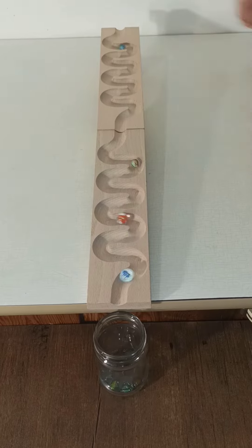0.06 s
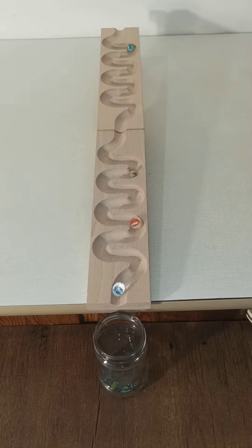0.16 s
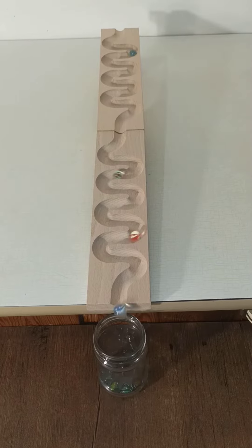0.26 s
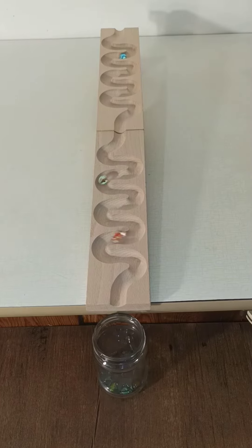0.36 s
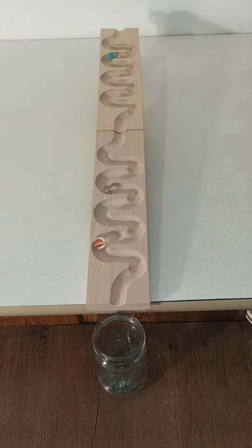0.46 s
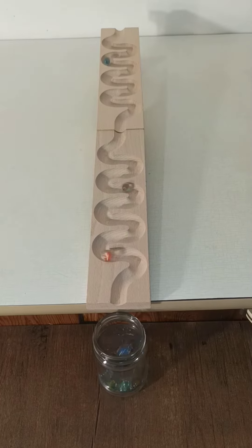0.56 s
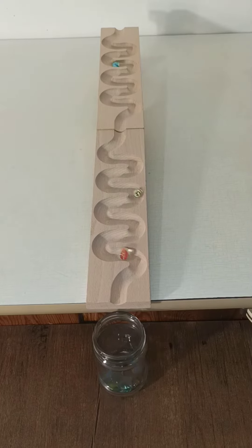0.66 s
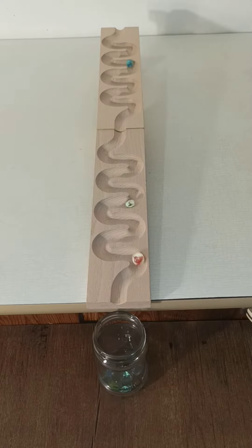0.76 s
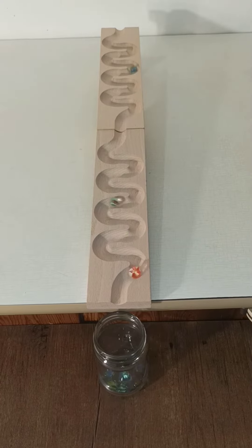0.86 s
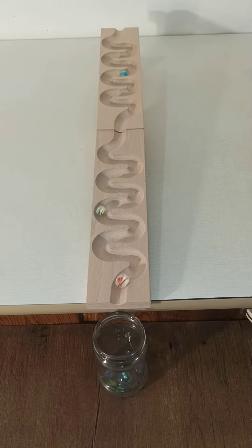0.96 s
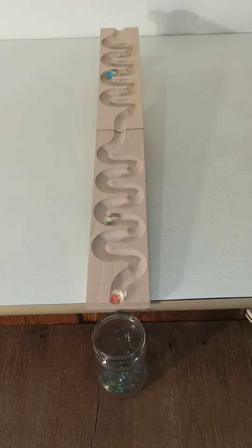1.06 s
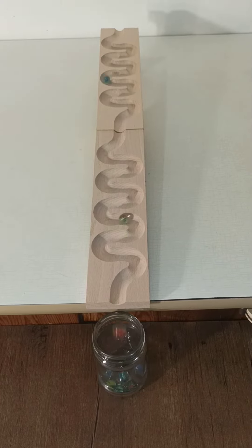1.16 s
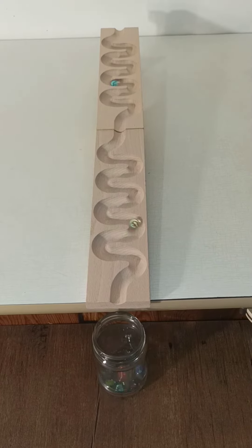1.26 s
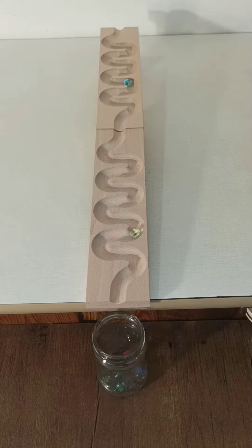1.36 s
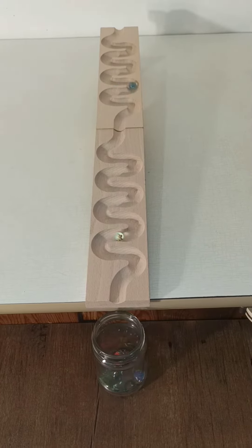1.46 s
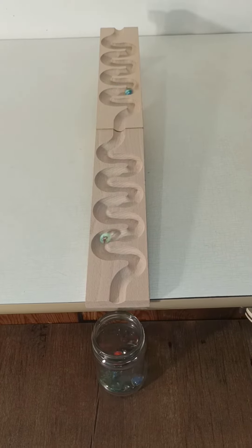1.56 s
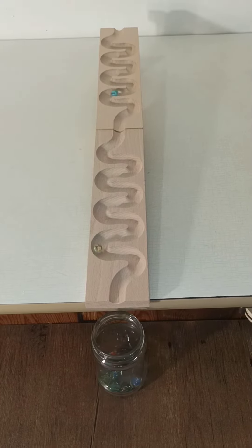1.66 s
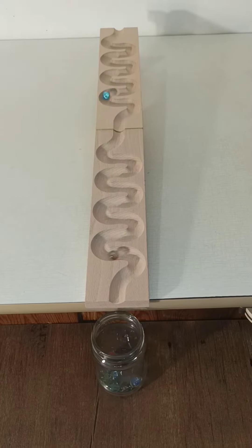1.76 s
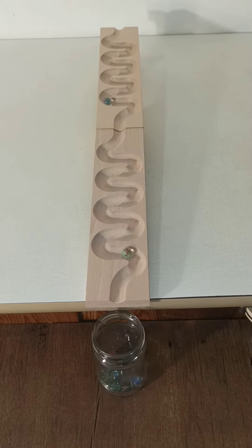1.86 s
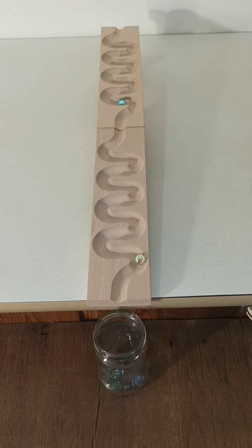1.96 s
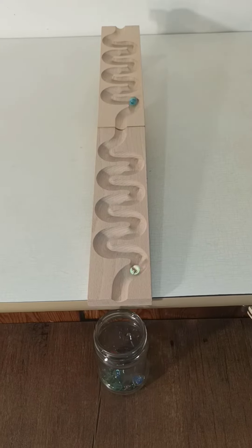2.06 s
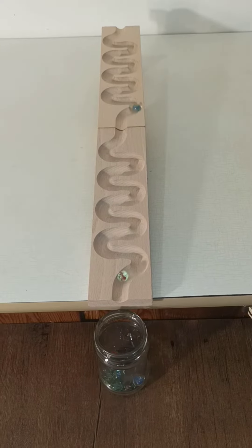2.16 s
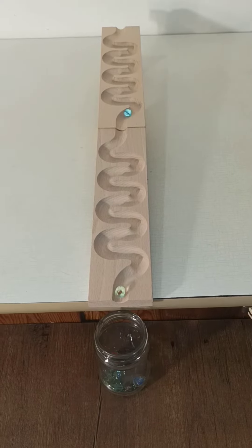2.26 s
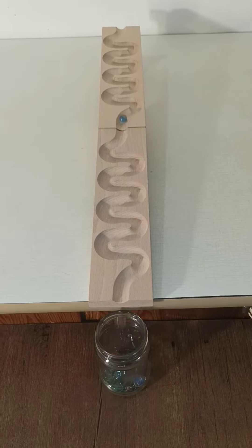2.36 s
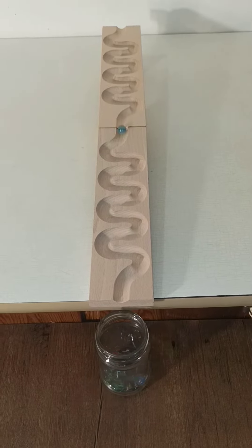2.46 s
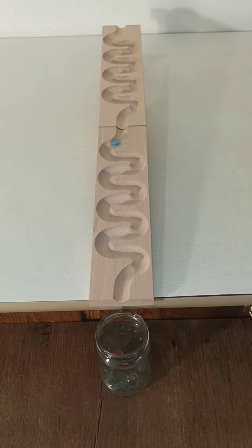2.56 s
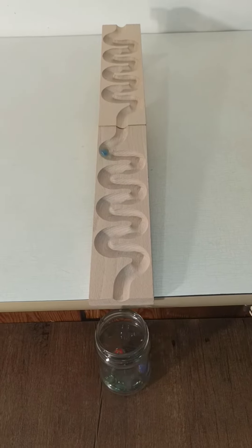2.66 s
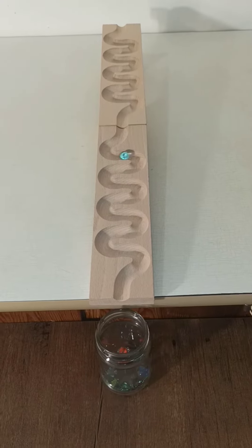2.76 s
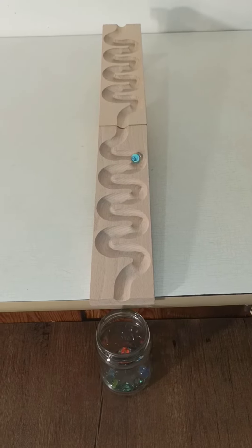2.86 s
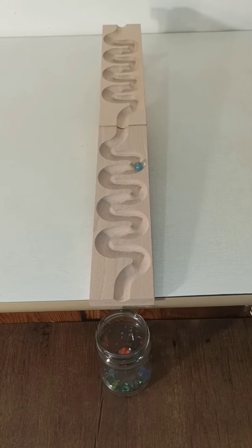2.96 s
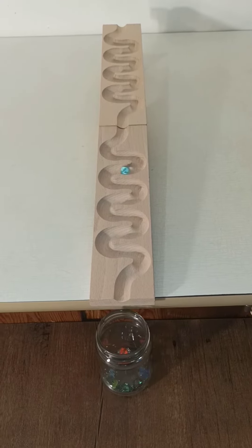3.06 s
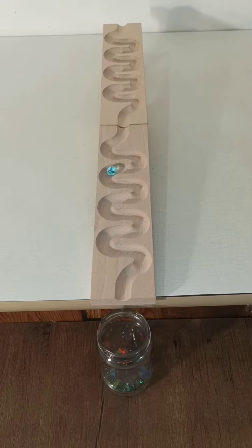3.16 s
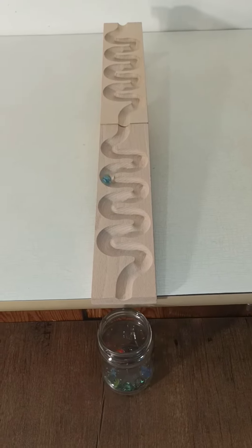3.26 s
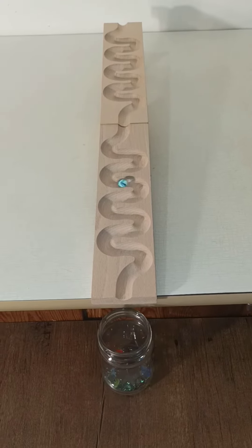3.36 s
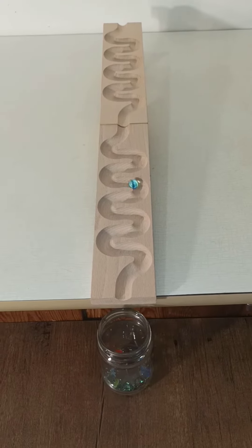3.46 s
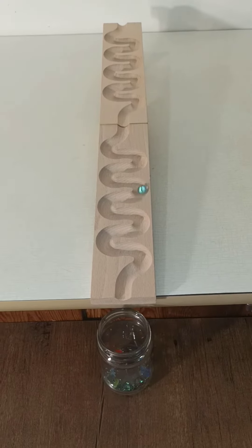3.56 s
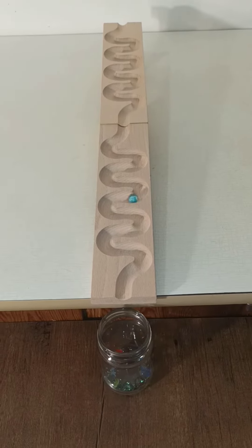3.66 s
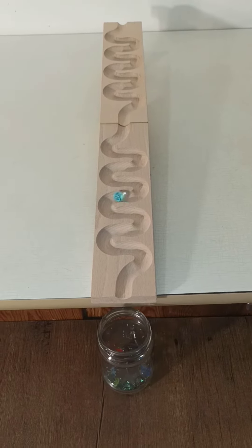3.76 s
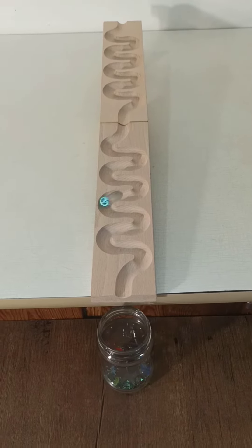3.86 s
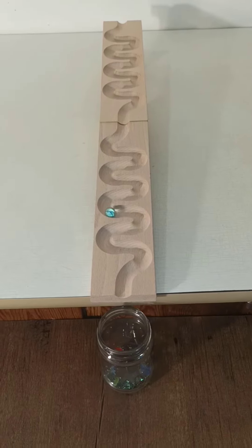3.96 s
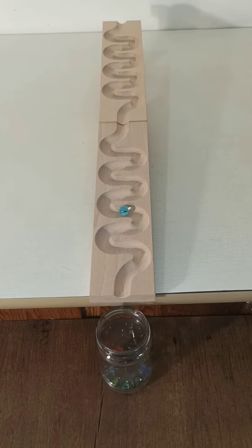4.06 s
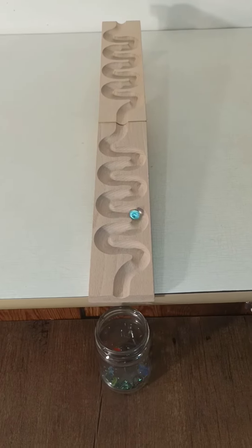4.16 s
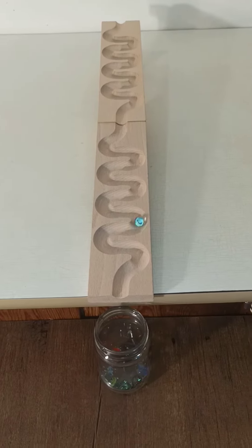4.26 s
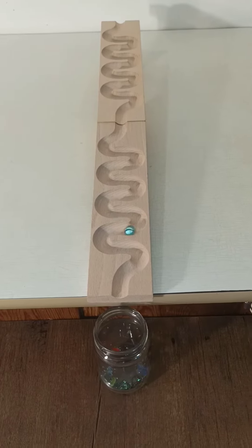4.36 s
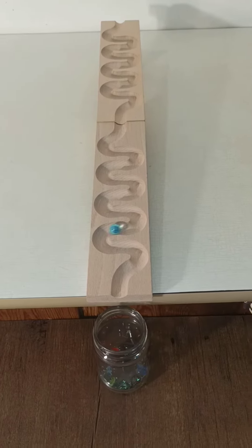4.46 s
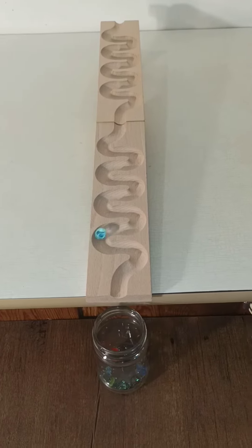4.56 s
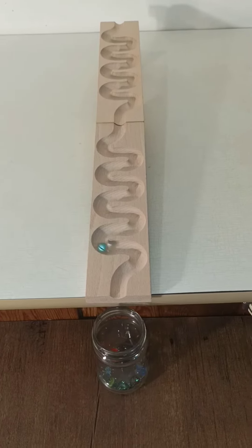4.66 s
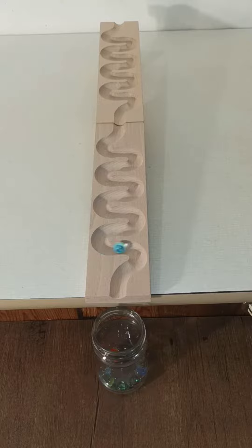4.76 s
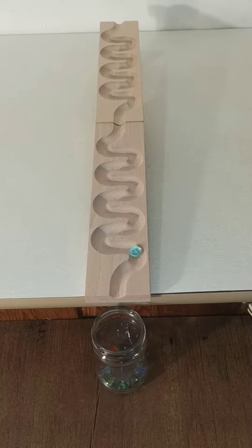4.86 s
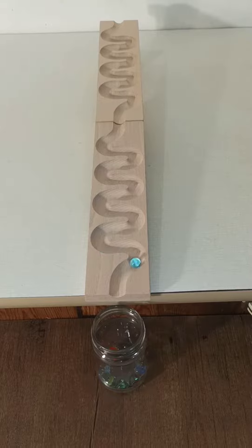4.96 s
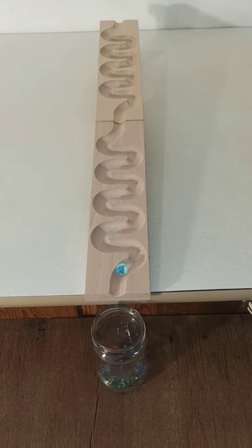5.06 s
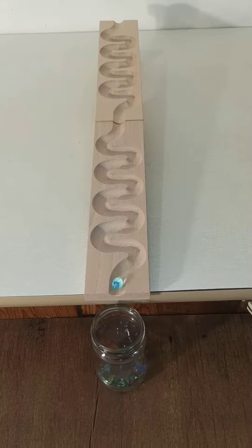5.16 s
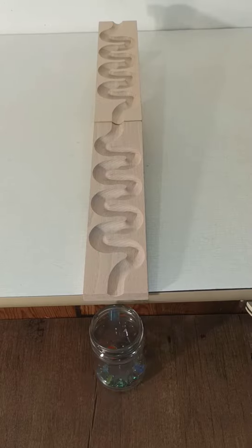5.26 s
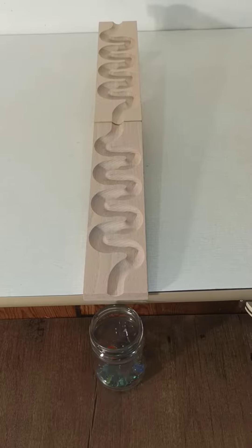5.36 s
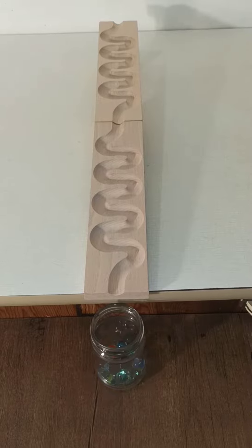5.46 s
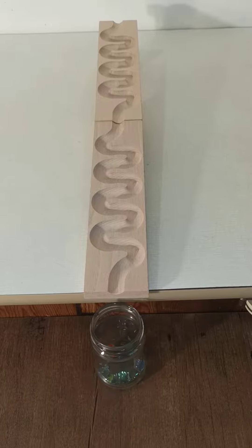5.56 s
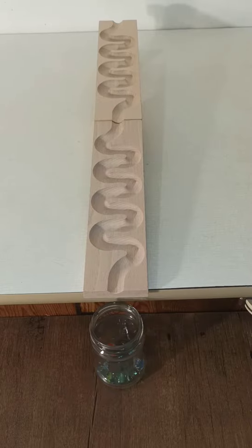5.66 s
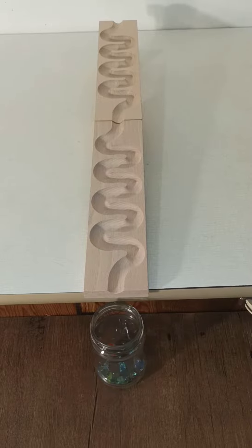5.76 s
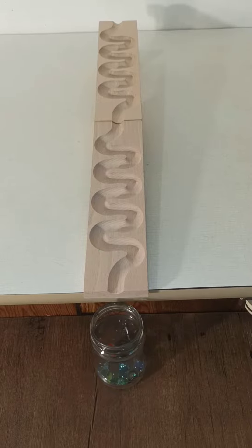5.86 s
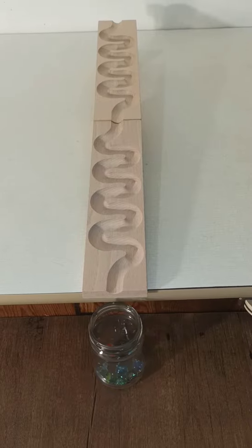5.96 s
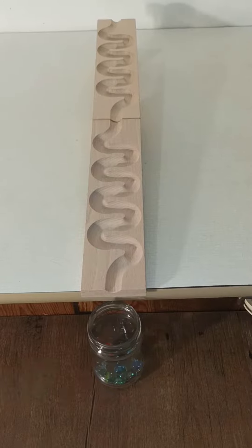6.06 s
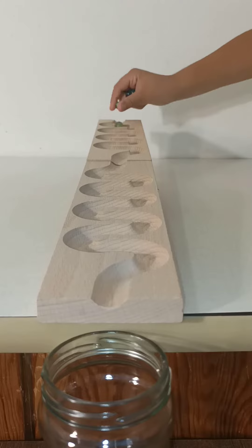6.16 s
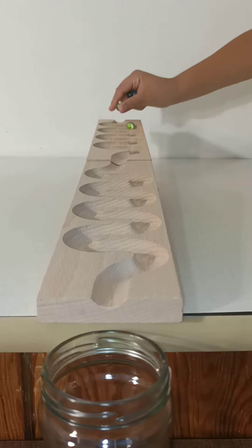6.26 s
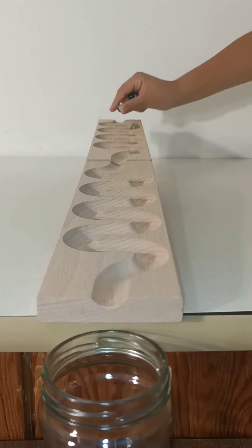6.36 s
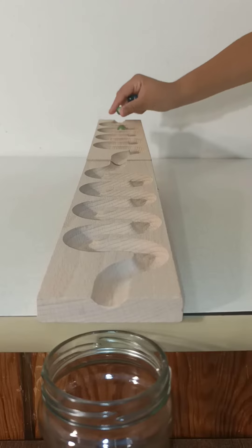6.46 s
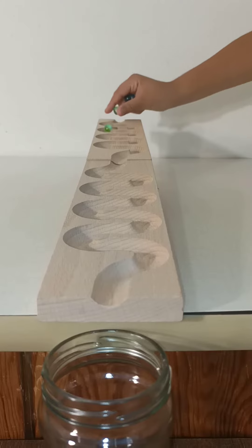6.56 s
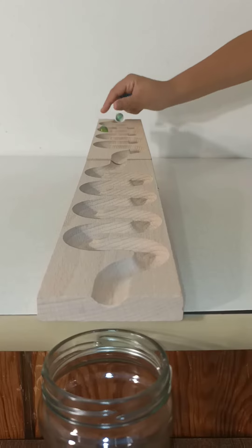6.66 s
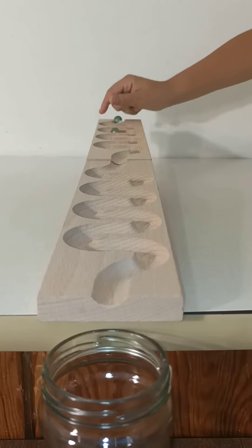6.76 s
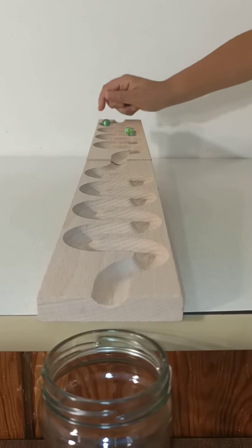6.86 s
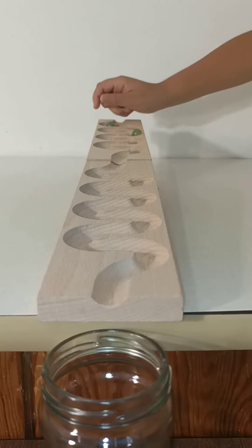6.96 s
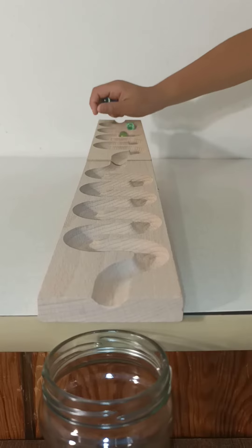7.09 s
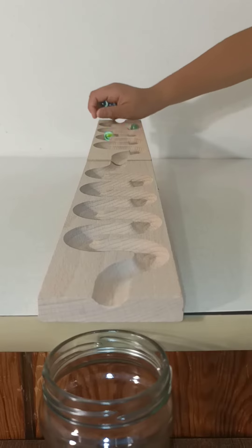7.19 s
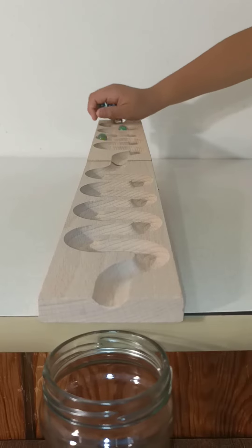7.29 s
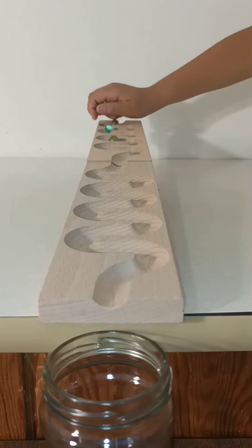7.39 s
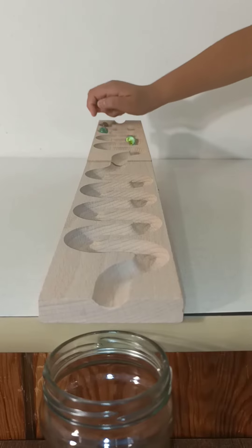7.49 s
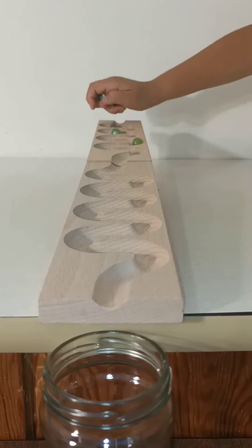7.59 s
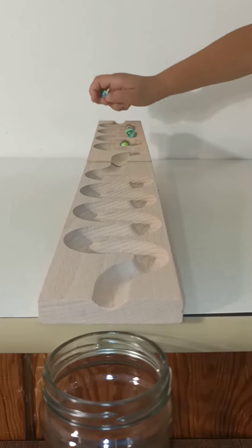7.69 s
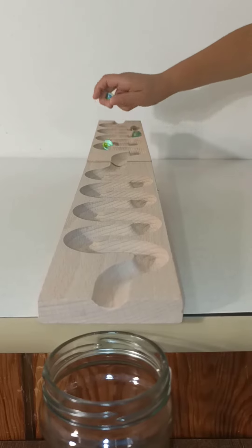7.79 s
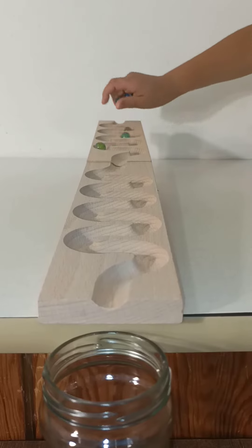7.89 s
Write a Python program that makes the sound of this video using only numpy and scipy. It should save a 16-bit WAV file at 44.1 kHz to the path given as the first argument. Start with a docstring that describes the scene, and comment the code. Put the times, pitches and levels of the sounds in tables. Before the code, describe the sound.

In a small bare room, glass marbles roll down a grooved wooden board with a low grainy rumble and soft knocks at the bends. Four drop into a glass jar, each with a hard crack, quick bounces and a bright ringing rattle that settles. After the last one the sound cuts to a more distant, echoing view, where marbles are dropped on the wood with clicks and roll off. Close stereo microphone, faint hiss.

```python
"""In a bare small room, glass marbles roll down a winding wooden groove, knock at its bends and drop one by
one into a glass jar, where they clink and rattle until they settle. Then a cut to a place farther away: a
hand drops marbles on the top of the board. Noise bursts and small random contacts drive the modes of glass
and wood; coloured noise fills in between the modes. Sparse taps make the room, soft noise its air and hiss.
A pair of close microphone ports with a limiter picks it up."""
import sys
import numpy as np
from scipy import signal
from scipy.fft import rfft, irfft, next_fast_len
from scipy.io import wavfile
from scipy.ndimage import uniform_filter1d, minimum_filter1d

SR = 44100
rng = np.random.default_rng(int(sys.argv[2]) if len(sys.argv) > 2 else 0)


def output_pcm(signal):
    """Save a mono or channel-first signal as 16-bit PCM at the path in sys.argv[1].

    Samples are clipped to [-1, 1] before scaling.
    """
    pcm = np.clip(np.atleast_2d(signal).T, -1, 1) * 32767
    wavfile.write(sys.argv[1], SR, np.round(pcm).astype(np.int16))


def gain_from_db(level_db):
    """Turn a decibel level (scalar or array-like) into a linear amplitude factor."""
    decades = np.asarray(level_db, float) / 20
    return 10 ** decades


N = 349713
TIME = np.arange(N) / SR
LIVELY_DB = -11  # jostle level below which the jar counts as settling

# Landings and bounces in the jar. Each row: time in seconds, crack level in dB, then the thud and the ring
# in dB added to the crack level.
CLINKS = [(0.358, -4, -17.5, 2.5), (0.372, -14, -1.5, -5), (0.382, -18, -21, -6), (0.398, -19, -12, -9.5),
          (0.415, -26.5, -17, 1.5), (0.457, -36.5, -16, 5), (0.5426, -14.5, -5.5, -8),
          (0.5576, -13.5, -20.5, -9), (0.613, -18, -15.5, 6.5), (0.645, -12, -9, 1),
          (0.666, -32, -15.5, -6), (0.692, -18.5, -27, -8.5), (0.7361, -37, -17.5, 4),
          (0.9162, -29.5, -21.5, 7.5), (1.2083, -9.5, -12.5, -5), (1.222, -3.5, -17, -6),
          (1.2449, -14, -26, -10), (1.283, -22.5, -16.5, -3.5), (1.3216, -21.5, -25, -1),
          (1.3441, -7, -7.5, 0.5), (1.4142, -7.5, -12, 2.5), (1.4725, -19, -13, -3.5),
          (1.515, -33.5, -13.5, 0), (1.5359, -30.5, -14.5, 5), (1.6562, -37, -10.5, 20.5),
          (2.4198, -27, -13.5, -0.5), (2.425, -9, -17, -4), (2.439, -17, -2.5, -8),
          (2.4928, -17.5, -15.5, -17), (2.5295, -10, -21, 5), (2.618, -27, -13, -2.5),
          (2.7005, -21, -5, -6), (2.811, -35.5, -12, 21.5), (3.2441, -37, -9, 4.5), (5.3254, -8, -18.5, 7),
          (5.337, -5.5, -7.5, -11.5), (5.348, -23, -13.5, -15), (5.3718, -26, -10.5, 9),
          (5.417, -10, -15, 9.5), (5.489, -21, -17.5, -16.5), (5.498, -20, -6.5, 4),
          (5.5067, -25, -12.5, 7), (5.553, -20, -23, -5.5), (5.6663, -50, -13.5, 18),
          (5.697, -38, -14.5, 10), (5.7457, -35, -39, 10), (5.769, -34.5, -12.5, 1),
          (5.7866, -39, -6.5, 23), (5.9012, -43, -3.5, 13)]
# Blows that leave the glass singing, each in place of the one before. Each row: time in seconds, wall level
# in dB, shoulder level in dB.
STRIKES = [(.358, -35, -35), (.395, -28, -26.5), (.5426, -25.5, -30.5), (.68, -34.5, -34),
           (.87, -37, -30.5), (1.207, -27, -28.5), (1.27, -23.5, -26), (1.37, -22, -33.5),
           (1.43, -35, -31.5), (1.6544, -38, -31), (2.445, -25.5, -34.5), (2.5275, -30.5, -28.5),
           (2.575, -35, -32.5), (2.6985, -34.5, -40.5), (2.81, -39, -38), (3.2455, -42, -39.5),
           (5.3259, -30.5, -29.5)]
# A marble knocks on a bend or is dropped on the wood. Each row: time in seconds, level in dB, then the low
# knock and the hard knock in dB added to that level.
KNOCKS = [(0.0505, -33.5, 14, -10), (0.148, -25, 2, -20), (.2904, -38, -13, -28.5), (1.114, -48, 5.5, 2.5),
          (1.162, -34, -12.5, -7.5), (1.8718, -30.5, 1, -25.5), (1.9736, -36, 10, -3.5),
          (1.99, -32.5, 11, -17.5), (2.0436, -38.5, -11.5, -24.5), (2.065, -44.5, -5, -28),
          (2.098, -40.5, 6, -15), (2.2166, -35, -1, -24.5), (2.231, -33.5, 9, -22.5),
          (2.296, -35, -7, -25.5), (2.383, -35.5, -5, -26), (2.317, -34.5, -31, -39),
          (2.347, -29.5, -18, -38), (3.117, -59, -7, -18), (3.1384, -57, -10, 6), (3.1655, -35, -5, -6.5),
          (3.259, -41.5, 19.5, -7), (3.3549, -38, 5, -8), (3.469, -35, -1, -11), (3.5376, -35.5, 5, -13.5),
          (3.5692, -35.5, 9, -8), (3.7636, -32, -15, -7), (3.800, -32.5, -9, -6.5), (3.858, -34, 7, -6.5),
          (3.894, -27, -2, -6), (4.0812, -53.5, -7, -14), (4.158, -39.5, 14, -16), (4.214, -34, -2, -16.5),
          (4.38, -34, -12, -17), (4.441, -48, -5, -14), (4.493, -40.5, -5, -13), (4.522, -43, -11, -8),
          (4.576, -31, -3, -4), (4.61, -43, 0.5, -14.5), (4.692, -48.5, 6, -19.5),
          (4.8826, -32.5, 10.5, -11), (4.925, -37, 11, -10.5), (5.0143, -33, 5, -18.5),
          (5.0883, -37.5, 7.5, -12.5), (5.1477, -29, -32, -16), (5.169, -44, 17.5, -10),
          (6.005, -31.5, -11, -7.5), (6.128, -35.5, 11, -24), (6.2481, -29.5, 4, -28),
          (6.2915, -31.5, 8, -17.5), (6.4505, -36, -6, -31), (6.521, -38, 8, -25), (6.551, -14, -32, -21.5),
          (6.6022, -18.5, 0.5, -15.5), (6.622, -22, -2, -9.5), (6.6666, -23.5, 1.5, -7),
          (6.9227, -32.5, 10.5, -25), (7.217, -17.5, -23, -15.5), (7.666, -33, 10, -26),
          (7.7507, -35, -14, -17)]


def evened(x):
    """Scales to rms 1."""
    return x / np.sqrt(np.mean(x ** 2) + 1e-20)


def read(points, hz):
    """Reads a table over frequency on a log-frequency axis."""
    f, value = np.transpose(points)
    return np.interp(np.log(hz + 1), np.log(f + 1), value)


def coloured(x, points, even=True):
    """Causal minimum-phase filter with the given spectrum and, if even, energy 1."""
    level_db = np.maximum(read(points, abs(np.fft.fftfreq(32768, 1 / SR))), -100)
    minimum_phase = np.exp(np.conj(signal.hilbert(np.log(gain_from_db(level_db)))))
    response = np.fft.ifft(minimum_phase).real[:16384] * np.hanning(32768)[16384:]
    if even:
        response = response / np.linalg.norm(response)
    return signal.oaconvolve(x, response[None], axes=1)[:, :N]


def ring(x, hz, width, soft_hz):
    """A mode at hz, fixed or moving; unit noise in gives about unit rms out; soft contacts keep its skirts steep."""
    turn = np.exp(2j * np.pi * np.cumsum(hz * np.ones(N)) / SR)
    r, q = np.exp(-np.pi * np.abs([width, soft_hz]) / SR)
    gain = np.sqrt(2 - 2 * r * r) * (1 - q)
    return (turn * signal.lfilter([gain], np.poly([r, q]), x / turn)).real


def modes(x, table, soft_hz, scale=1, size=40, place=None, order=0):
    """All modes of a body; each reaches the right port order samples later, plus a random 0 to size - 1.
    The place of the contact favours some modes and shuns others."""
    total = np.sqrt(sum(gain_from_db(2 * db) for _, _, db in table))
    out = np.zeros((2, N))
    for k, (hz, width, db) in enumerate(table):
        shape = 1 if place is None else gain_from_db(5.5 * np.cos(np.pi * (k + 1) * place))  # 5.5 dB either way
        tone = gain_from_db(db) / total * ring(shape * x, hz * scale, width, soft_hz)
        out[0] += tone
        out[1] += np.roll(tone, order + rng.integers(0, size))
    return out


def contacts(s, db):
    """One clean single-sample contact at each time."""
    out = np.zeros(N)
    out[np.round(s * SR).astype(int)] = gain_from_db(db)
    return out


def grains(per_s, spread_db):
    """Random contacts of uneven size, rms 1."""
    size = gain_from_db(spread_db * np.minimum(rng.exponential(1, N), 4))
    return evened(size * rng.standard_normal(N) * (rng.random(N) < per_s / SR))


def blows(s, db, t60):
    """Noise bursts that start sharply at s and die away, mostly different at the two ports."""
    envelope = signal.lfilter([1], [1, -gain_from_db(-60 / t60 / SR)], contacts(s, db))
    common, own = rng.standard_normal(N), rng.standard_normal((2, N))
    return envelope * (0.33 * common + 0.65 * own)


def wander(size):
    """Slow chance of rms 1, smooth over size samples."""
    once = uniform_filter1d(rng.standard_normal(N), size=size)
    return evened(uniform_filter1d(once, size=size))


def ports(x, points):
    """Tilts left against right by frequency, half the difference on each port."""
    sides = []
    for k, sign in enumerate((1, -1)):
        tilt = [(hz, sign * db / 2) for hz, db in points]
        sides.append(coloured(x[[k]], tilt, even=False))
    return np.vstack(sides)


def pair():
    """Two unit noises, alike or unrelated at the two ports according to frequency."""
    # Each row: frequency in Hz, left-right likeness from 0 to 1.
    likeness = [(60, 0.028), (150, 1), (380, 0.77), (950, 0.055), (2380, 0.15), (5980, 0.089), (15000, 1)]
    size = next_fast_len(N)
    a, b = rfft(rng.standard_normal((2, size)))
    same = np.clip(read(likeness, np.fft.rfftfreq(size, 1 / SR)), -1, 1)
    return irfft(np.array([a, same * a + np.sqrt(1 - same ** 2) * b]), size)[:, :N]


def jar():
    """Landings and a jostle of small contacts excite the glass jar, heard differently at each port."""
    # Each row: frequency in Hz, left over right in dB.
    jar_side = [(60, 2.5), (99, 2), (160, 7), (270, 16), (450, 3.5), (740, 4.5), (1220, 1.5), (2010, 0.5),
                (3330, 2), (5500, -1), (6900, -6), (9080, 7.5), (15000, 15)]
    stir = stirring()
    base_db = stir[0]
    jostle = gain_from_db(base_db) * grains(per_s=1500, spread_db=2.4)
    return ports(ringing_glass(jostle, *stir) + landings(jostle, base_db), jar_side)


def ringing_glass(jostle, base_db, base_hz, wall_db, rim_db, belly_db, shoulder_db):
    """Jostle, sliding and landings drive the resonant modes of the base, foot, wall, rim and belly."""
    # Modes of the base. Each row: factor on the base pitch, width in Hz, level in dB.
    base = [(1, 70, 0), (1.02, 110, -4), (.93, 500, -17), (1.065, 130, -13)]
    # Modes of the foot, wall, rim and belly, and a close shoulder pair that beats.
    # Each row: frequency in Hz, width in Hz, level in dB.
    foot = [(6550, 16, -6), (6615, 16, -5), (6668, 12, 0), (6700, 14, -2)]
    wall = [(4708, 14, -4), (4737, 13, 0), (8791, 12, -4)]
    rim = [(10190, 30, -10), (10650, 40, -4), (11055, 16, -3), (11260, 70, 0), (11400, 110, -5),
           (11700, 70, -8), (11850, 70, -9), (12110, 30, -11)]
    belly = [(345, 25, -6), (458, 11, -3), (565, 20, -3), (680, 25, -6)]
    shoulder = [(2846, 6, -1), (2865, 6, 0)]
    s, crack_db, _, ring_db = np.transpose(CLINKS)
    _, sing_db, hum_db = np.transpose(STRIKES)
    slide = gain_from_db(base_db) * rng.standard_normal(N)  # marbles slide along the glass
    kicks = blows(s, crack_db + ring_db + 12, 0.0054)[0]
    # the base mode climbs as the marbles come to rest and load the glass
    glass = gain_from_db(-10.5) * modes(jostle + kicks, base, 1300, base_hz, size=1)
    loose = np.clip((6850 - base_hz) / 150, .05, 1)  # resting marbles damp the foot
    glass += gain_from_db(-4.35) * modes(loose * (jostle + kicks), foot, 270, size=1)
    glass += modes(gain_from_db(wall_db - 8) * slide + gain_from_db(-27) * kicks, wall, 200, size=3)
    glass += modes(gain_from_db(rim_db) * jostle + gain_from_db(-13.5) * kicks, rim, 470)
    glass += modes(gain_from_db(belly_db - 9) * jostle + gain_from_db(-23) * kicks, belly, 330, size=1, order=8)
    glass += modes(gain_from_db(shoulder_db - 26) * slide, shoulder, 200, size=1, order=5)
    glass += singing(sing_db, wall[:2], 30, base_db, order=1)
    glass += singing(hum_db, shoulder, 8, base_db, order=5)
    return glass


def landings(jostle, base_db):
    """Each contact gives a broad crack, a sharp edge and a thud; glass on glass chatters between the modes."""
    # Spectra of chatter, crack and thud. Each row: frequency in Hz, level in dB per Hz.
    chatter_colour = [(180, -29), (300, -3.5), (468, 61.5), (2360, -29.5), (2880, -9), (4210, -23.5),
                      (4570, -71.5), (6900, -42.5), (9600, -52), (11700, 23.5), (15500, -110)]
    crack_colour = [(150, -28.5), (250, -8.5), (614, -1.5), (1410, -6), (2620, -2.5), (4630, -12),
                    (5600, -64.5), (6770, -19.5), (8040, -42.5), (11600, -37.5), (15500, -73)]
    thud_colour = [(15, -6.5), (30, 2.5), (60, -1.5), (110, 5.5), (200, 4.5), (320, 0), (600, 0.5),
                   (1000, -12)]
    # Short modes of a hard bounce. Each row: frequency in Hz, width in Hz, level in dB.
    clack = [(1560, 120, -5), (2090, 90, 0), (2380, 110, -5), (3300, 300, -12)]
    s, crack_db, thud_db, _ = np.transpose(CLINKS)
    chatter = gain_from_db(-42) * coloured(gain_from_db(base_db) * pair() + .5 * jostle, chatter_colour)
    bursts = blows(s, crack_db - 6.5, 0.14) + blows(s, crack_db - 0.5, 0.041)
    crack = coloured(bursts + gain_from_db(base_db - 27.5) * pair(), crack_colour)
    crack += modes(blows(s, crack_db + 0.5, 0.024)[0] + contacts(s, crack_db + 4), clack, 750)
    crack += blows(s, crack_db - 10.5, 0.0095)  # the sharp edge of each contact
    # the jar jolts the floor; each port takes in the other, so the thud is more alike at both
    jolt = blows(s, crack_db + thud_db + 0.5, 0.052) + contacts(s, crack_db + thud_db + 13.5)
    thud = coloured(jolt + 2.3 * jolt[::-1], thud_colour)
    return chatter + crack + thud


def stirring():
    """Each stir holds, then settles ever faster; one liveliness sets the level, pitch and balance of the jar."""
    # A landing or a late tumble stirs the marbles. Each row: time in seconds, ring level in dB, lively time
    # in seconds, then wall and shoulder ring in dB re base, before trims.
    stirs = [(0.356, -12.5, 0.013, -3, 1), (0.541, -14.5, 0.17, -3.5, -2), (.86, -37, 0.013, -8.5, 3),
             (1.205, -12, 0.24, 2, -0.5), (2.421, -14, 0.3, 1.5, -5.5), (3.241, -48, 0.0035, -4, 3),
             (5.325, -15.5, 0.25, 1.5, 1.5)]
    waver_db, waver_hz = 3.5, 44.4  # rms: the heap shifts, so level, pitch and mode shares wander
    s, ring_db, lively_s, wall_db, shoulder_db = np.transpose(stirs)[:, :, None]
    late = np.maximum(TIME - s - lively_s, 0)
    fall_db = np.minimum(50.5 * late + 169.5 * late ** 2, 150)
    power = (TIME >= s) * gain_from_db(2 * (ring_db - fall_db))
    total = power.sum(0) + 1e-12

    def shared(db):
        """Average over the stirs, weighted by their power."""
        return (power * db).sum(0) / total

    level_db = 10 * np.log10(total)
    settled_db = np.clip(LIVELY_DB - level_db, 0, 45)
    base_hz = 6727 + 5 * settled_db + waver_hz * wander(size=900)
    # the wall speaks at the landing, then the marbles keep to the bottom
    wall = shared(wall_db - 61 * np.clip(TIME - s, 0, .26))
    rim = -11 - 0.65 * settled_db
    belly = -15 + .35 * np.minimum(shared(fall_db), 40)  # the belly outlasts the base
    shoulder = shared(shoulder_db + .18 * np.minimum(fall_db, 40))  # outlasts it a little
    shares = [db + waver_db * wander(size=1500) for db in (wall, rim, belly, shoulder)]
    return level_db + waver_db * wander(size=700), base_hz, *shares


def singing(level_db, partials, sag_db_per_s, base_db, order):
    """A close pair of partials starts in step at each blow, beats, flutters with the heap and is hushed by it."""
    at = np.transpose(STRIKES)[0]
    last = np.searchsorted(at, TIME) - 1
    age = abs(TIME - at[last])
    hush_db = .4 * (base_db - LIVELY_DB)  # settling marbles damp the free decay
    onset = (last >= 0) * np.minimum(age / .005, 1)
    envelope = onset * gain_from_db(level_db[last] - sag_db_per_s * age + hush_db)
    tone = envelope * sum(gain_from_db(db) * np.sin(2 * np.pi * hz * age) for hz, _, db in partials)
    return np.array([tone, np.roll(tone, order)])


def board(body, table, here):
    """Rolling grit and knocks shake the wood: its modes over a dull broad body, while here is true."""
    # Marbles rolling in the groove and, after a landing, round the jar: a list for the near place, then one
    # for the far place. Each row: time in seconds, rumble level in dB.
    roll = [
        [(0.0, -37), (0.05, -31), (0.34, -34), (0.37, -35), (0.75, -28.5), (0.95, -31.5), (1.195, -37.5),
         (1.22, -28.5), (1.7, -33.5), (1.9, -33), (2.41, -44), (2.43, -22.5), (2.91, -35), (3.02, -41.5),
         (3.29, -36.5), (3.34, -42), (3.72, -45), (3.9, -41.5), (4.05, -43), (4.3, -38.5), (4.52, -44.5),
         (4.75, -41), (4.92, -36.5), (5.18, -45.5), (5.323, -69.5), (5.328, -25), (5.83, -39.5), (6.0, -52)],
        [(6.01, -40), (6.426, -41), (6.522, -51), (6.554, -27.5), (6.586, -38), (6.662, -45), (6.806, -36),
         (7.074, -40.5), (7.138, -38), (7.196, -40.5), (7.202, -50), (7.218, -29.5), (7.436, -39.5),
         (7.704, -36), (7.816, -38), (7.93, -30.5)],
    ]
    # Where the wood is touched. Each row: time in seconds, share of the board's width.
    touched = [(0, 0.084), (2.3, 0.16), (3.12, 0.091), (3.26, 0.13), (3.47, 0.26), (3.56, 0.17),
               (3.76, 0.11), (3.8, 0.57), (3.85, 0.92), (3.89, 0.87), (4.0, 0.88), (4.1, 0.72),
               (4.22, 0.66), (4.32, 0.76), (4.4, 0.84), (4.5, 0.26), (4.58, 0.22), (4.7, 0.35), (4.88, .12),
               (4.93, 0.15), (5.02, 0.3), (5.09, 0.14), (5.15, 0.088), (6.0, 0.055), (6.55, 0.15),
               (6.62, 0.15), (7.22, 0.08)]
    rumble_db = np.interp(TIME, *np.concatenate(roll).T)
    swing_db = 1.1 * (rumble_db + 41.5)  # grit grows a little faster than rumble
    grit = gain_from_db(-56 + swing_db)
    rumble = gain_from_db(rumble_db - 1.5 + 2 * wander(size=1800))  # swells and sinks by slow chance
    s, peak_db, low_db, hard_db = np.transpose(KNOCKS)
    place = np.interp(TIME, *np.transpose(touched))
    low = [mode for mode in table if mode[0] < 850]
    middle = [mode for mode in table if 850 <= mode[0] < 2100]
    high = [mode for mode in table if mode[0] >= 2100]

    # the marble presses unevenly on the grain, so the grit comes in lumps
    lumps = gain_from_db(3.6 * evened(uniform_filter1d(rng.standard_normal(N), size=1500)) - 2.5)
    rolling = here * (0.82 * grains(per_s=590, spread_db=0) + 0.86 * rng.standard_normal(N))
    # the marble hops on the grain in short rattles, weaker against strong grit
    hops = signal.lfilter([1], [1, -.985], abs(grains(per_s=39, spread_db=4)))
    rattle = gain_from_db(-19 - np.maximum(swing_db - 6.5, 0)) * here * hops * rng.standard_normal(N)
    scrape = grit * (lumps * rolling + rattle)

    def knock(db, t60, skid_db=-8):
        """A sharp contact, then the marble skids along the wall of the bend."""
        return here * (blows(s, db, t60) + blows(s, db + skid_db, 0.28))

    low_drive = rumble * rolling + knock(peak_db + low_db + 1.5, 0.035)[0]
    wood = gain_from_db(-5.5) * modes(low_drive, low, 59, size=12)
    middle_drive = scrape + knock(peak_db - 4.5, 0.02, skid_db=-5)[0] + here * contacts(s, peak_db + 11)
    wood += gain_from_db(-4.5) * modes(middle_drive, middle, 380, place=place)
    hard_knock = knock(peak_db + hard_db - 0.5, 0.04)[0] + here * contacts(s, peak_db + hard_db + 16)
    wood += modes(gain_from_db(-15.5) * scrape + hard_knock, high, 500, place=place)
    wood += gain_from_db(-8) * coloured(here * rumble * lumps * pair() + knock(peak_db, 0.099), body)
    return wood


def glassy_ticks(here):
    """Short bright bursts: marbles click against one another, and every knock has a faint glassy edge."""
    # Marble against marble. Each row: time in seconds, level in dB.
    clicks = [(1.1136, -43), (1.163, -40), (1.8703, -53), (6.004, -41), (6.6047, -23), (6.619, -52),
              (6.6651, -30), (7.021, -55), (7.219, -24), (7.234, -27.5)]
    # Each row: frequency in Hz, level in dB per Hz.
    tick_colour = [(1760, -22.5), (3000, -6.5), (3980, -6.5), (4680, -9.5), (6960, -16.5), (15000, -68)]
    # What the click sets ringing. Each row: frequency in Hz, width in Hz, level in dB.
    click_modes = [(2640, 130, -4), (3350, 150, -13), (4117, 79, -1.5), (5180, 120, -6), (5410, 66, -12),
                   (6850, 170, -19)]
    knock_s, knock_db, _, _ = np.transpose(KNOCKS)
    s, peak_db = np.transpose(clicks)
    bursts = blows(knock_s, knock_db - 46, .02) + blows(s, peak_db, 0.013)
    tick = coloured(here * bursts, tick_colour)
    return tick + modes(here * blows(s, peak_db - 5, 0.04)[0], click_modes, 500)


def room(x):
    """Reverberation: sparse taps of random sign, each band dying at its own speed."""
    # Each row: frequency in Hz, time to fall by 60 dB in seconds.
    decay = [(100, 0.78), (500, 0.62), (2000, 0.42), (6000, 0.44), (12000, 0.55)]
    echoes = np.zeros((2, SR))
    at = np.arange(200, SR - 20, 20) + rng.integers(0, 20, (2, (SR - 201) // 20))
    np.put_along_axis(echoes, at, rng.choice([-1., 1.], at.shape), 1)
    hz, t, z = signal.stft(echoes, SR, nperseg=256)
    fading = z * gain_from_db(-60 * t / read(decay, hz)[:, None])
    tail = signal.istft(fading, SR, nperseg=256)[1]
    crossed = x + 0.24 * x[::-1]
    return signal.fftconvolve(crossed, tail / np.linalg.norm(tail[0]), axes=1)[:, :N]


def background():
    """Quiet room air as steady coloured noise, and a soft hiss that swells."""
    # Each row: time of the peak in seconds, half length in seconds, level in dB.
    hiss = [(.001, 0.048, -49), (0.301, 0.35, -55.5), (2.154, 0.31, -60)]
    # Spectra of the hiss and of the air. Each row: frequency in Hz, level in dB per Hz.
    hiss_colour = [(1760, -1.5), (3000, -2.5), (3710, -2), (5160, -9), (8470, -13), (11900, -28),
                   (15500, -25)]
    air_colour = [(25, -40), (60, -27.5), (170, -2), (400, -7), (1100, -29.5), (2800, -32.5), (5000, -37),
                  (9000, -45), (16000, -62)]
    swell = np.zeros(N)
    for s, half, db in hiss:
        swell += gain_from_db(db) * np.cos(np.pi / 2 * np.clip((TIME - s) / half, -1, 1))
    return coloured(swell * pair(), hiss_colour) + gain_from_db(-60) * coloured(pair(), air_colour)


def scene():
    """The near place is cut off with its tail; the far place is wetter."""
    # Modes of the near and of the far board. Each row: frequency in Hz, width in Hz, level in dB.
    near_modes = [(186.4, 25, -6.5), (206.6, 35, -6.5), (310.4, 6.2, -3.5), (348.1, 32, 4),
                  (472.4, 24, 3.5), (575, 48, 2.5), (630, 18, -8), (677, 190, 3.5), (1023, 50, 2),
                  (1341.6, 78, 4), (1732, 160, 5), (1836, 13, -7.5), (2347, 85, 1), (2640, 150, -4),
                  (2880, 450, -3.5), (3297, 80, 0), (3920, 100, -20.5), (1620, 600, 1.5)]
    far_modes = [(172, 15, -9.5), (205, 18, 0), (297, 37, 5.5), (351, 33, 7), (432, 79, 0.5),
                 (503.4, 32, 3.5), (666, 63, 2), (730, 30, -3.5), (1040, 87, -3.5), (1216, 120, 2),
                 (1647, 300, 10), (1838, 260, 5.5), (2360, 1700, 8.5), (2750, 250, 11.5), (3275, 110, 1.5),
                 (3980, 120, 3)]
    # Wood between the modes, near and far. Each row: frequency in Hz, level in dB per Hz.
    near_body = [(24, -36), (40, -18.5), (281, 2), (329, 5.5), (484, 7), (779, 0.5), (1020, 1),
                 (1140, -8.5), (2360, -14.5), (2830, -20.5), (9000, -92), (11700, -93), (19800, -120)]
    far_body = [(30, -65), (110, -12.5), (200, -7), (350, -1.5), (700, -6), (900, -13), (1850, -19.5),
                (2400, -24), (4300, -54), (5200, -54), (9000, -57), (16000, -100)]
    first = TIME < 6.007  # seconds, the cut to the far place
    glass = jar()
    wood = gain_from_db([[1.2], [-1.2]]) * board(near_body, near_modes, first)  # a little left
    tick = glassy_ticks(first)
    near = glass + wood + tick + room(gain_from_db(-7) * glass + gain_from_db(-8) * wood + gain_from_db(0.5) * tick)
    wood, tick = board(far_body, far_modes, ~first), glassy_ticks(~first)
    far = wood + tick + room(gain_from_db(-1.5) * wood + gain_from_db(5.5) * tick)
    return first * near + far + background()


def top_cut(x):
    """Nothing passes above the cut-off."""
    return signal.sosfilt(signal.butter(12, 16500, fs=SR, output="sos"), x)


def record(dry):
    """The top is cut above about 12 kHz, then a quick limiter holds the peaks."""
    # Each row: frequency in Hz, overall response in dB before evening to energy 1.
    overall = [(20, -19.5), (60, -1.5), (12200, 2.5), (12800, -27.5), (15500, -21.5), (16500, -34.5)]
    heard = gain_from_db(2) * coloured(dry, overall)
    # the louder port's running peak over 60 samples
    peak_db = -minimum_filter1d(-20 * np.log10(abs(heard).max(0) + 1e-9), size=60)
    fall_db = TIME * 200  # the followed peak falls 200 dB a second
    followed_db = np.maximum.accumulate(peak_db + fall_db) - fall_db
    over_db = np.maximum(followed_db + 9, 0)  # above -9 dB full scale
    held = heard / gain_from_db(0.7 * uniform_filter1d(over_db, size=40))  # takes back 70 % of the excess
    return top_cut(held)


dry = scene()
out = record(dry)
output_pcm(out)
```